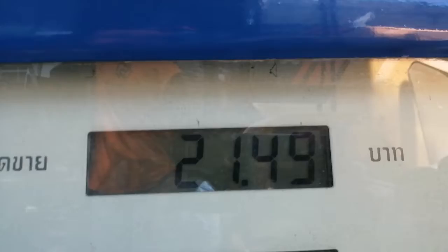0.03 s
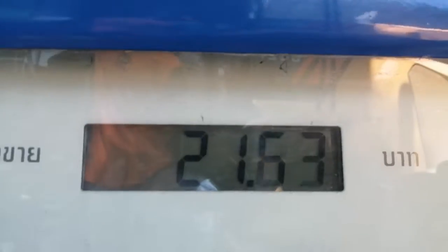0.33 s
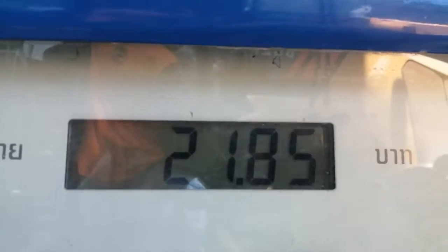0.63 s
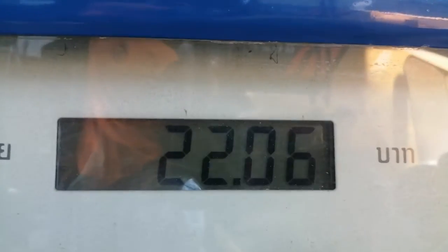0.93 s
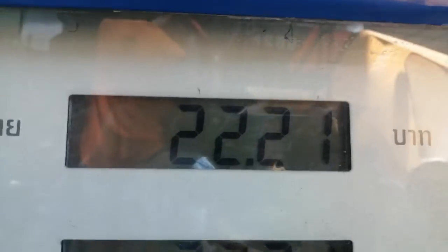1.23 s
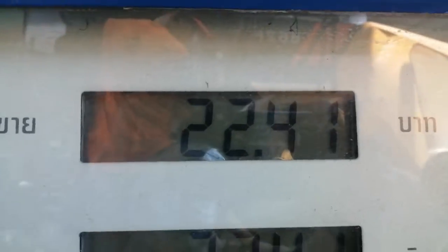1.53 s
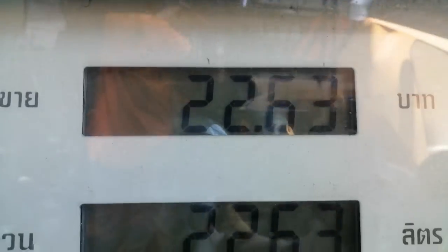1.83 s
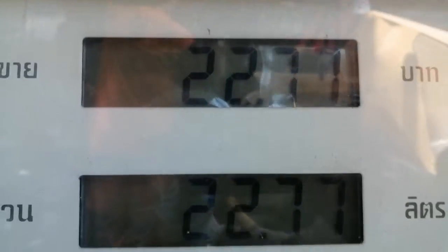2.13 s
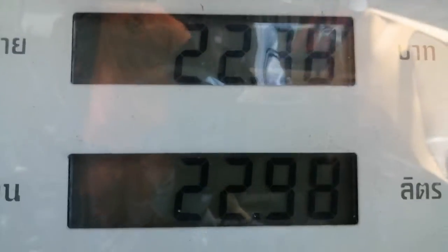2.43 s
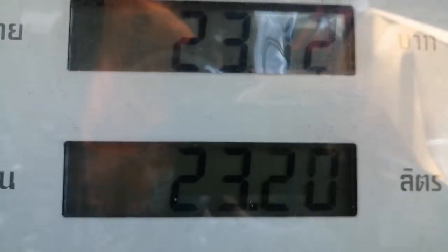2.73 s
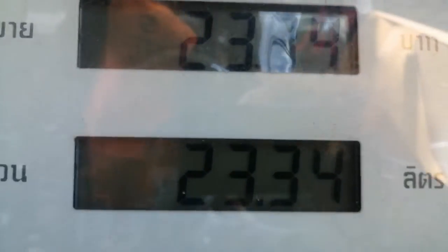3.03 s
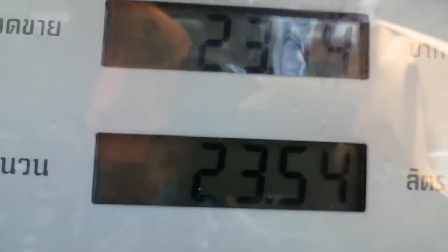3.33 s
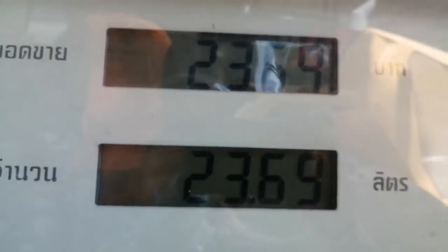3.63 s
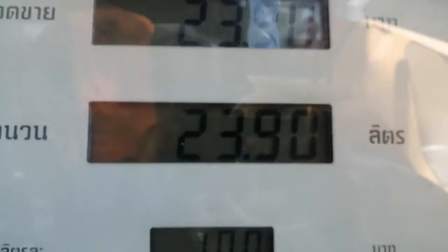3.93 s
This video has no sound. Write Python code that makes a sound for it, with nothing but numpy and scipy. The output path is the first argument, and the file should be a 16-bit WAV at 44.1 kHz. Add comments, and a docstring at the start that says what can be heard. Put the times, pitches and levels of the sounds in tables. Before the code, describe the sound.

A running fuel pump hums and rattles close by at a filling station, starting abruptly and throbbing about three times a second. Faint fuel hiss, brief high pipe tones and small squeaks join it, while a low drone fades away.

```python
"""After a short silence, the hum and rattle of a fuel dispenser cut in, heard from just in front of it.
The motor hums. The pump shakes the cabinet and makes its metal rattle and ring, pulsing with each
turn of its shaft and in a slower cycle, about three times a second. Rushing fuel hisses, while a low
drone nearby creeps up in pitch and dies away. Now and then the pipes sing and a rubbing part squeaks."""
import sys
import numpy as np
from scipy import signal
from scipy.fft import rfft, irfft
from scipy.io import wavfile
from scipy.ndimage import uniform_filter1d

SR = 44100
rng = np.random.default_rng(int(sys.argv[2]) if len(sys.argv) > 2 else 0)


def inscribe(sig):
    """Save sig as 16-bit PCM at rate SR to the path in sys.argv[1].

    A 1-D sig is mono; a 2-D sig holds one channel per row.
    Samples are clipped to [-1, 1] before scaling.
    """
    pcm = np.round(np.clip(np.atleast_2d(sig).T, -1, 1) * 32767)
    wavfile.write(sys.argv[1], SR, pcm.astype(np.int16))


N = 176400

CYCLE_HZ, SHAFT_HZ = 3.314, 33.14  # pump cycles and shaft turns per second
SHAFT_RING_DB = 1.3  # how far each turn swings the ringing up and down
# How hard the pump works through one cycle: share_of_cycle, rumble_db, rattle_db, ring_db
PUMP_LOAD = [(.03, 0.3, -0.84, 1.5), (.16, -1, -1.3, 0), (.24, 0, 0.3, 2.9), (.37, 0.6, -0.5, 1.5),
             (.44, 0.7, -0.5, 2.9), (.54, 0, 0.2, 3.5), (.68, -0.8, -1, 0), (.85, -1.3, -1, 0)]
# Slow changes in loudness: time_s, rumble_db, rattle_db, ring_db
SLOW_LEVELS = [(.43, -38.5, -42.5, -41.5), (1, -38, -40.5, -40), (1.7, -40, -42.5, -40.5),
               (2.1, -38.5, -43, -41), (2.6, -41.5, -43, -39.5), (3.2, -41.5, -44, -40.5),
               (4, -40.5, -44, -41.5)]
# Left minus right as the microphone moves: time_s, ring_db, rattle_db, rumble_db
BALANCE = [(0.45, -15, -6.5, -4.5), (0.72, -21, -6.5, -4), (0.81, -13.5, -3.5, 0), (2.38, -22.5, -8, -5.0),
           (3.28, -21.5, -10, -7.0), (4.0, -23, -9.5, -7)]


def undb(db):
    """Turn decibels into a number to multiply by."""
    return 10 ** (np.asarray(db) / 20)


def clock():
    """Time of every sample in seconds."""
    return np.arange(N) / SR


def curve(table, column=1):
    """One column of a table, joined by straight lines in time."""
    rows = np.array(table, float)
    return np.interp(clock(), rows[:, 0], rows[:, column])


def wander(rate_hz):
    """A smooth random wobble of about size 1, heading somewhere new rate_hz times a second."""
    hold = int(SR / rate_hz)
    steps = np.repeat(rng.standard_normal(N // hold + 1), hold)
    smooth = uniform_filter1d(uniform_filter1d(steps, hold), hold)[:N]
    return smooth / smooth.std()


def pan(db):
    """Left and right gains that average 1; positive db leans left."""
    gains = undb(np.array([db, -db]).reshape(2, -1) / 2)
    return gains / gains.mean(axis=0)


def swell(at_s, length_s):
    """A smooth bump of height 1, centred on at_s."""
    return np.exp(-2 * ((clock() - at_s) / length_s) ** 2)


def impacts(rate_hz, scatter_db):
    """Stereo noise, like countless tiny knocks, whose strength wobbles at rate_hz."""
    return rng.standard_normal((2, N)) * undb(scatter_db * wander(rate_hz))


def resonate(drive, colour, modes=()):
    """Give a sound a broad tone colour and ringing notes (modes), then scale it to a standard level."""
    freqs = np.arange(N // 2 + 1) * SR / N + 1e-3
    hz, db = np.array(colour, float).T
    gains = undb(np.interp(np.log(freqs), np.log(hz), db))
    # Build the filter so that it rings only after a knock, never before.
    cepstrum = irfft(np.log(gains), N)
    cepstrum[1:N // 2] *= 2
    cepstrum[N // 2 + 1:] = 0
    response = np.exp(rfft(cepstrum))
    for pitch_hz, width_hz, boost_db in modes:
        detuning = (freqs * freqs - pitch_hz ** 2) / (freqs * width_hz)
        response = response * (1 + (undb(boost_db) - 1) / (1 + 1j * detuning))
    sound = irfft(rfft(drive) * response, N)
    return sound / sound.mean(axis=0).std()


def load_db(column):
    """Rise and fall in level through the pump's slow cycle."""
    rows = np.array(PUMP_LOAD)
    return np.interp(clock() * CYCLE_HZ, rows[:, 0], rows[:, column], period=1)


def shaft(peak_share=0.46):
    """One push for each turn of the shaft, from -1 to 1."""
    return np.cos(2 * np.pi * (clock() * SHAFT_HZ - peak_share))


def echoes(sound, fade_s=0.12, echo_db=-6.5):
    """Add quick reflections inside the cabinet, different left and right; they fall 60 dB in fade_s."""
    t = clock()[:SR // 4]
    tail = rng.standard_normal((2, len(t))) * np.exp(-np.log(1000) * t / fade_s)
    tail *= undb(echo_db) / np.linalg.norm(tail, axis=1, keepdims=True)
    return sound + signal.fftconvolve(sound, tail, axes=1)[:, :N]


def motor_hum(hum_hz=100, hum_db=-44.5, throb_db=4.5, peak_share=0.092, waver_db=1.8):
    """Mains electricity makes a hum that throbs once a pump cycle; turning parts add wavering tones."""
    # Other motor and pump tones: pitch_hz, level_db
    tones = [(33.1, -66), (66.3, -59.5), (133.1, -47.5), (166.1, -54.5), (206.4, -54), (309.5, -61)]
    t = clock()
    throb = throb_db * np.cos(2 * np.pi * (t * CYCLE_HZ - peak_share))
    hum = undb(hum_db + throb + .8 * wander(22.1)) * np.sin(2 * np.pi * hum_hz * t)
    for hz, db in tones:
        gain = undb(db + waver_db * wander(7))
        hum = hum + gain * np.sin(2 * np.pi * (hz * t + rng.random()) + .5 * wander(5.02))
    return np.sqrt(2) * hum * pan(db=-8)


def cabinet_rumble(alike_hz=850, shaft_db=0.4, flutter_db=0.42):
    """Pressure knocks shake the cabinet; its lowest notes reach both microphones alike."""
    # Tone colour of the rumble: pitch_hz, gain_db
    colour = [(25, -27), (58, -12), (72, -11.5), (100, -5.5), (135, -5.5), (160, -3), (235, -3.5),
              (400, -5), (520, -9), (640, -11), (900, -25.5), (1200, -46.5)]
    # Notes the cabinet rings at: pitch_hz, width_hz, boost_db
    modes = [(164, 8, 4), (202, 13, 3), (382.7, 19, 4.5), (435.4, 20, 4), (648, 12, 5)]
    # Heavier shudders: middle_s, length_s, boost_db
    shudders = [(0.742, .04, 0.5), (1.017, 0.054, 2), (1.885, 0.064, 3), (2.553, 0.033, 4),
                (2.84, .04, 2.5), (3.105, 0.032, 2.5), (3.408, 0.019, 4.5), (3.71, 0.039, 3)]
    shared, side = impacts(rate_hz=300, scatter_db=1.5)
    side = signal.sosfilt(signal.butter(1, alike_hz, "high", fs=SR, output="sos"), side)
    rumble = resonate(np.array([shared + side, shared - side]), colour, modes)
    db = curve(SLOW_LEVELS, column=1) + load_db(column=1) + shaft_db * shaft()
    db += flutter_db * wander(25.15)
    db += sum(boost_db * swell(at, length) for at, length, boost_db in shudders)
    return rumble * undb(db) * pan(curve(BALANCE, column=3))


def panel_rattle(shaft_db=-0.5, flutter_db=1.0):
    """The pump's fine rattle sounds through the sheet metal panels."""
    # Tone colour of the rattle: pitch_hz, gain_db
    colour = [(440, -20.5), (750, -9.5), (846, -4), (922, -8), (1530, -10), (1750, -2.5), (2100, -3.5),
              (2410, -6.5), (2960, -7), (3200, -4), (3850, -12.5), (4100, -11.5), (5330, -27), (9020, -120)]
    # Notes the panels ring at: pitch_hz, width_hz, boost_db
    modes = [(1141, 20, 6), (1630, 11, 1), (1760, 5.7, 3), (2064, 11.6, 8), (2120, 18, 5.5), (2180, 9.9, 8),
             (2278, 11, 5.5), (2735, 16, 2.5), (3120, 16, 0.5), (3286, 55, 4.5)]
    knocks = impacts(rate_hz=600, scatter_db=1.0)
    knocks *= undb(load_db(column=2) + shaft_db * shaft() + flutter_db * wander(25.11))
    rattle = resonate(echoes(knocks), colour, modes)
    return rattle * undb(curve(SLOW_LEVELS, column=2)) * pan(curve(BALANCE, column=2))


def pipe_ring(pulse_db, flutter_db=1.0):
    """Chatter on every shaft turn keeps the pipes ringing brightly."""
    # Tone colour of the ringing: pitch_hz, gain_db
    colour = [(3500, -47), (4000, -21.5), (4400, -14), (4700, -7.5), (5200, 0), (5550, -3.5), (5850, -5.5),
              (6200, -11), (6700, -15.5), (7300, -20.5), (9000, -35.5)]
    # Notes the pipes ring at: pitch_hz, width_hz, boost_db
    modes = [(4268, 19, 11.4), (4630, 13, 4.2), (4700, 20, 4.3), (5150, 14, 3.1), (5265, 12, 8.5),
             (5387, 15.5, 8.4), (5428, 13, 6.9), (5740, 31, 3.8), (5740, 16, 5.1)]
    chatter = impacts(rate_hz=500, scatter_db=1.0) * undb(pulse_db + flutter_db * wander(29.75))
    ring = resonate(echoes(chatter), colour, modes)
    return ring * undb(curve(SLOW_LEVELS, column=3)) * pan(curve(BALANCE, column=1))


def fuel_hiss(pulse_db, follow_share=0.68):
    """Rushing fuel hisses and follows the pump's pulsing."""
    # Tone colour of the hiss: pitch_hz, gain_db
    colour = [(4500, -24), (6500, 6), (7400, -1), (8400, -0.5), (9800, 5), (11000, -6.5), (13000, -7.5),
              (15000, -12.5), (16000, -2)]
    # Slow changes in the hiss: time_s, level_db
    levels = [(.43, -57), (.8, -52), (1.06, -51), (1.38, -52), (1.48, -55.5), (1.76, -54), (1.84, -58.5),
              (2.6, -57.5), (3.2, -58), (4, -58.5)]
    hiss = resonate(echoes(impacts(rate_hz=860, scatter_db=1.5)), colour)
    return hiss * undb(curve(levels) + follow_share * pulse_db) * pan(db=13)


def low_drone(waver_db=1.8):
    """A low drone, perhaps an idling engine, creeps up in pitch and dies away."""
    # Path of the drone: time_s, pitch_hz, level_db
    path = [(.43, 40.8, -52), (.72, 41.4, -50), (.88, 44.2, -45), (1.3, 43.8, -49), (1.65, 45, -44.5),
            (1.95, 45.1, -43.5), (2.2, 46, -46.5), (2.4, 48.3, -55), (2.6, 49, -48), (2.81, 49, -45.5),
            (2.9, 49, -69), (4, 49, -66)]
    phase = 2 * np.pi * np.cumsum(curve(path, column=1)) / SR
    gain = undb(curve(path, column=2) + waver_db * wander(16.3))
    return np.sqrt(2) * np.sin(phase) * gain * pan(db=-3)


def pipe_song(surge, roughness=0.25):
    """In each burst two close notes of the pipes ring out and beat against each other."""
    # The pipes' two strongest notes: pitch_hz, gain_db
    notes = [(5227, -2), (5390, -4)]
    song = sum(undb(db) * np.sin(2 * np.pi * (hz * clock() + rng.random()) + roughness * wander(120))
               for hz, db in notes)
    flutter = undb(SHAFT_RING_DB * shaft() + 0.9 * wander(150))
    return np.sqrt(2) * song * surge * flutter * pan(curve(BALANCE, column=1))


def squeaks(roughness=0.3):
    """A rubbing part makes the metal sing briefly, one note for each rub."""
    # Squeaky rubs: middle_s, length_s, pitch_hz, level_db
    rubs = [(.79, 0.059, 4250, -49.5), (0.948, 0.036, 4268, -47), (1.06, 0.045, 2273, -50),
            (1.95, 0.14, 2255, -48), (2.25, 0.077, 4268, -48.5), (2.497, 0.11, 2260, -48.5),
            (2.563, 0.045, 5680, -42), (2.9, .05, 4680, -45), (3.17, 0.038, 5820, -49),
            (3.196, .08, 2260, -51), (3.77, .05, 4268, -53), (3.8, 0.1, 2284, -46.5)]
    song = sum(undb(db) * swell(at, length) * np.sin(2 * np.pi * hz * clock() + roughness * wander(90))
               for at, length, hz, db in rubs)
    return np.sqrt(2) * song * pan(db=-12)


def scene():
    """All parts of the running dispenser, with the drone behind."""
    # Bursts in which the pipes sing: middle_s, length_s, level_db
    bursts = [(0.757, .05, -48), (1.219, 0.023, -35.5), (1.376, 0.028, -34), (1.65, .05, -45),
              (2.244, 0.061, -45), (2.58, 0.053, -44), (2.885, 0.047, -39), (3.17, .05, -46),
              (3.335, .04, -34.5), (3.487, 0.047, -33), (3.768, 0.1, -45)]
    surge = sum(undb(db) * swell(at, length) for at, length, db in bursts)
    surge_db = 1.6 * surge / surge.max()  # bursts also lift the chatter and hiss
    pulse_db = load_db(column=3) + SHAFT_RING_DB * shaft() + surge_db
    running = motor_hum() + cabinet_rumble() + panel_rattle() + pipe_ring(pulse_db) + fuel_hiss(pulse_db)
    return running + low_drone() + pipe_song(surge) + squeaks()


def record(dry, start_s=.428, top_hz=15400):
    """The sound cuts in suddenly after silence; the highest treble is removed."""
    treble_cut = signal.ellip(10, .2, 70, top_hz, fs=SR, output="sos")
    return signal.sosfilt(treble_cut, dry * (clock() >= start_s))


dry = scene()
out = record(dry)
inscribe(out)
```